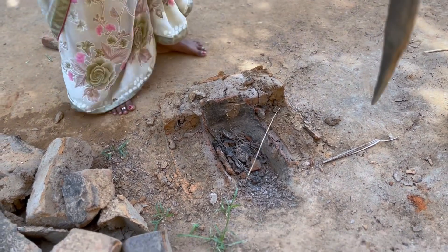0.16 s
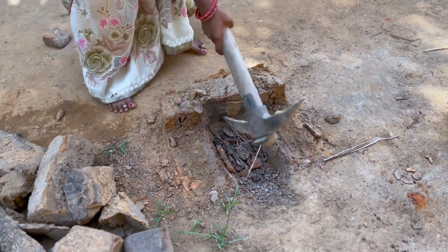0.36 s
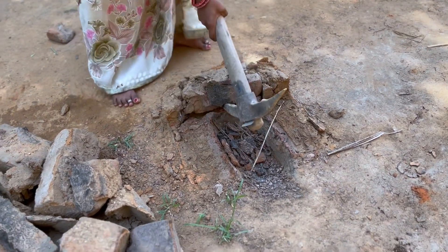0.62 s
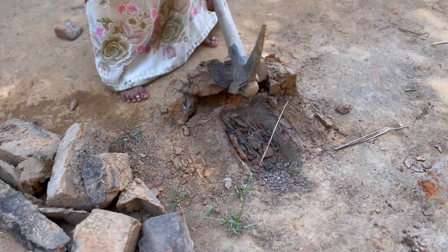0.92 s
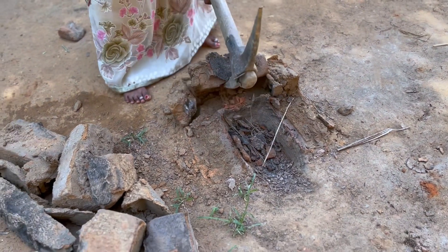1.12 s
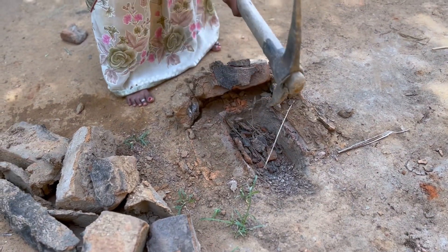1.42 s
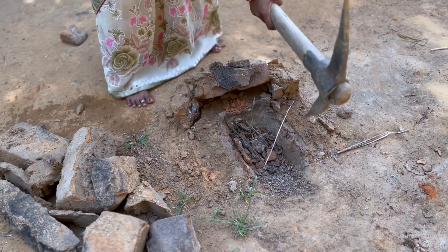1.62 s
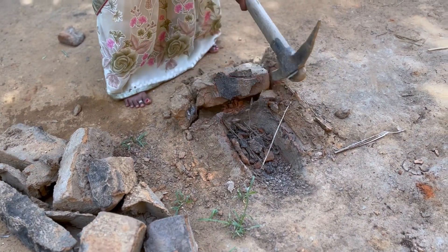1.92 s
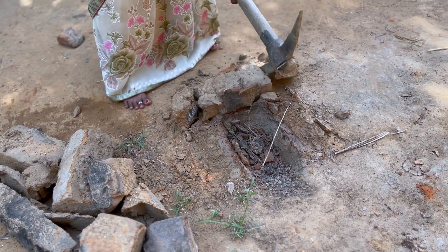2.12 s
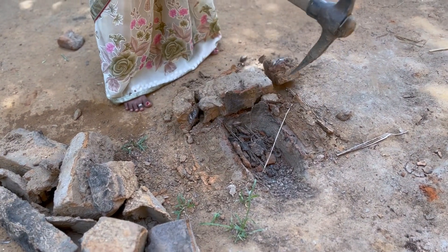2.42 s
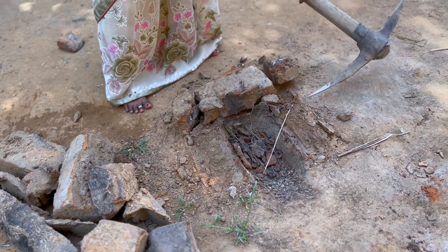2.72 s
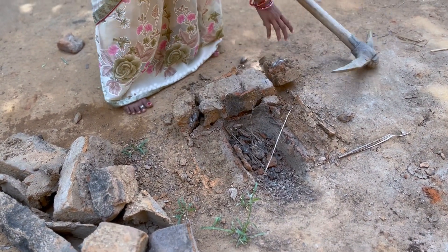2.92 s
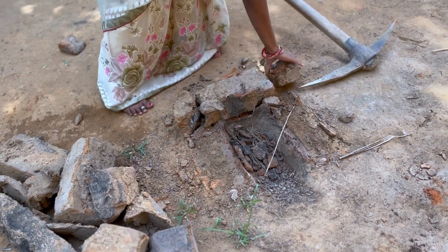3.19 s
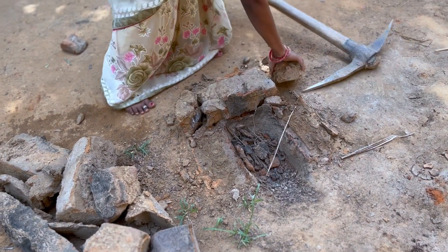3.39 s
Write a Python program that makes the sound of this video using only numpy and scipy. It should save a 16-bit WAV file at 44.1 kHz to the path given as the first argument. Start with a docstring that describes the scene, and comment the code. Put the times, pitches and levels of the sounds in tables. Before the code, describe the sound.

A pickaxe hits brick and dried clay several times in an open yard, each blow followed by clattering pieces and trickling grit. A fly buzzes faintly past, more chunks knock down, and a tossed brick ends it with a sharp clack.

```python
"""An open yard: a pickaxe is driven into an old stove of brick and dried mud, levered and dragged out.
Chunks knock, crack and thud on the ground and grit trickles, all exciting one bank of rubble resonances.
The steel head and glass bangles ring briefly, a fly buzzes past, and at the end a brick is tossed hard
onto other bricks. A small two-port microphone hears it over far rumble and leaf hiss."""
import sys
import numpy as np
from scipy import signal
from scipy.fft import rfft, irfft, next_fast_len
from scipy.io import wavfile
from scipy.ndimage import map_coordinates

SR = 44100
rng = np.random.default_rng(int(sys.argv[2]) if len(sys.argv) > 2 else 0)


def output_pcm(signal):
    """Save a mono or channel-first signal as 16-bit PCM at the path in sys.argv[1].

    Samples are clipped to [-1, 1] before scaling.
    """
    pcm = np.clip(np.atleast_2d(signal).T, -1, 1) * 32767
    wavfile.write(sys.argv[1], SR, np.round(pcm).astype(np.int16))


N = 156555
TIME = np.arange(N) / SR

# Knocks of steel, brick and clay. Each row: start in seconds, clack level in dB, clack pitch in Hz,
# six band levels in dB from low to high, rattle hold in seconds, rattle t60 at 2 kHz in seconds.
KNOCKS = [(0.233, -34, 2260, -69, -74, -62, -38.5, -69, -47, 0.0049, 0.067),
          (0.337, -2, 3060, -44, -12.5, -18.5, -11.5, -20.5, -29, 0.0065, 0.063),
          (0.35, -16, 2350, -45, -18, -40, -37, -23, -33, 0.0015, 0.075),
          (0.366, -5, 1750, -28.5, -44, -35, -22, -23.5, -29.5, 0.0026, 0.1),
          (0.421, -9, 4380, -42, -41.5, -45, -34, -27, -32, 0.0017, 0.044),
          (0.537, -32, 960, -36.5, -46, -46, -29, -57, -52, 0.0022, 0.068),
          (0.552, -23.5, 719, -77, -22.5, -42.5, -29.5, -42, -43, 0.0041, 0.083),
          (0.579, -21, 4220, -42, -74, -66, -49, -39.5, -60, 0.002, 0.048),
          (0.626, -28, 2920, -47, -63, -46, -31, -52, -39, 0.003, 0.089),
          (0.649, -35, 5660, -50, -69, -59, -40, -49, -32, 0.003, 0.045),
          (0.803, -37, 3600, -50, -70, -56, -33, -56, -63, 0.0027, 0.022),
          (0.827, -36, 1780, -53, -67, -68, -56, -61, -63, 0.0027, 0.037),
          (0.862, -33, 942, -45, -55, -41, -35, -53, -69, 0.0027, 0.045),
          (0.916, -21.5, 890, -62, -38, -39, -42, -40, -48, 0.0021, 0.074),
          (1.021, -17, 800, -96, -16, -20, -31.5, -36, -47.5, 0.0073, 0.022),
          (1.078, -19, 6780, -49, -68, -66, -97, -35.5, -43, 0.0034, 0.043),
          (1.227, -32, 786, -61, -44, -43, -77, -49, -67, 0.0026, 0.04),
          (1.267, -45, 800, -62, -49.5, -42.5, -63, -48.5, -84, 0.0023, 0.085),
          (1.331, -33, 776, -88, -53, -49, -90, -67, -80, 0.003, 0.026),
          (1.359, -38, 786, -66, -62, -56, -81, -67, -76, 0.0024, 0.038),
          (1.504, 1.5, 4170, -31, -14.5, -30, -21.5, -17, -24.5, 0.0011, 0.044),
          (1.608, -23, 1155, -54, -69, -31.5, -55, -41, -61, 0.0028, 0.032),
          (1.736, -18, 2430, -48, -41, -39, -25.5, -35, -35, 0.0046, 0.09),
          (1.747, 3.5, 3050, -64, -25.5, -38, -16.5, -25, -31, 0.0036, 0.069),
          (1.76, -2.5, 2450, -37, -52, -29.5, -27, -57, -31, 0.0051, 0.078),
          (1.777, -9, 2950, -28, -36.5, -34, -18.5, -43, -30.5, 0.0046, 0.1),
          (1.79, 0.5, 3070, -40, -39, -61, -30, -41, -40, 0.0021, 0.045),
          (1.8, -9, 2430, -59, -51, -39, -41, -47, -45, 0.0035, 0.067),
          (1.827, -25, 2640, -55, -42, -85, -22, -48, -45, 0.0034, 0.071),
          (1.885, -24, 2140, -37, -48, -63, -37, -62, -55, 0.0026, 0.078),
          (1.905, -6, 2245, -40, -21.5, -29.5, -23.5, -18, -27.5, 0.0011, 0.037),
          (1.992, -30, 743, -34.5, -34, -52, -43, -47, -49, 0.0022, 0.085),
          (2.014, -29, 2650, -35, -35, -73, -44, -51, -48, 0.0033, 0.067),
          (2.057, -25, 1820, -36, -58, -59, -42, -69, -48, 0.0034, 0.065),
          (2.09, -45, 770, -23, -34, -83, -43.5, -70, -41.5, 0.003, 0.048),
          (2.272, -24, 978, -50, -53, -48.5, -31, -39.5, -42, 0.0063, 0.066),
          (2.455, -22, 3210, -69, -65, -60, -37.5, -63, -47, 0.004, 0.096),
          (2.53, -23, 3124, -63, -69, -36.5, -25, -64, -45, 0.0039, 0.045),
          (2.74, -16, 1070, -32, -37, -20, -29.5, -41, -39.5, 0.002, 0.089),
          (2.775, 0, 1138, -4.5, -49, -5.5, -25.5, -26.5, -27.5, 0.0011, 0.056),
          (2.802, -4, 1560, -28, -68, -41, -24.5, -47, -32, 0.0037, 0.05),
          (2.817, -10.5, 2340, -26, -66, -46, -54, -39, -29.5, 0.0024, 0.066),
          (2.878, -24, 1080, -19, -30, -37, -43, -67, -58, 0.005, 0.074),
          (2.918, -16, 797, -42, -23.5, -31, -23.5, -24.5, -30, 0.0016, 0.043),
          (2.944, -14, 2370, -27, -49, -58, -32.5, -43, -67, 0.0027, 0.095),
          (3.095, -37, 830, -42, -73, -42, -47, -55, -46.5, 0.0035, 0.053),
          (3.12, -15, 1777, -29.5, -34, -36.5, -35.5, -37, -53, 0.0028, 0.12),
          (3.168, -19, 3270, -41, -48, -60, -35.5, -57, -44, 0.003, 0.071),
          (3.186, -23, 1590, -50, -60, -51, -36.5, -45.5, -38.5, 0.0019, 0.095),
          (3.219, -34, 2210, -46, -53, -66, -34.5, -67, -52, 0.0033, 0.049),
          (3.289, -35, 2000, -55, -66, -77, -40, -68, -67, 0.005, 0.08),
          (3.309, -29.5, 830, -32, -38.5, -45.5, -33.5, -35.5, -39.5, 0.003, 0.078),
          (3.46, -35, 2960, -58, -84, -74, -34.5, -59, -46, 0.0035, 0.041),
          (3.489, -36.5, 1620, -49, -71, -45, -47, -78, -70, 0.0075, 0.14),
          (3.52, -12, 1920, -25.5, -28.5, -10.5, -2.5, -15, -60, 0.0036, 0.033)]


def from_db(db):
    """Decibels to gain."""
    return 10 ** (np.asarray(db) / 20)


def at_hz(hz, points_hz, values):
    """Read a curve on a log-frequency axis."""
    return np.interp(np.log(hz), np.log(points_hz), values)


def drift(rate_hz):
    """A smooth random wander with a spread of 1."""
    pole = np.exp(-80 * np.pi * rate_hz / SR)
    slow = signal.lfilter([1], [1, -2 * pole, pole * pole], rng.standard_normal(N // 40 + 2002))[2000:]
    return np.interp(np.arange(N) / 40, np.arange(len(slow)), slow / slow.std())


def butter(x, hz, kind):
    """A second-order Butterworth filter."""
    return signal.sosfilt(signal.butter(2, hz, kind, fs=SR, output="sos"), x)


def ring(clicks, hz, t60):
    """One resonance: a unit click starts a decaying sine of height 1."""
    r, w = from_db(-60 / (t60 * SR)), 2 * np.pi * hz / SR
    return signal.lfilter([0, np.sin(w)], [1, -2 * r * np.cos(w), r * r], clicks + 1e-18)


def grains(per_s, spread_db):
    """Tiny collisions: random clicks of uneven size, at an rms of 1."""
    hits = rng.random(N) < per_s / SR
    sizes = from_db(spread_db * np.minimum(rng.exponential(1, N), 4))
    clicks = hits * sizes * rng.choice([-1, 1], N)
    return clicks / clicks.std()


def yard_air():
    """Far rumble and leaf hiss: half-octave noise bands, each wavering on its own."""
    # The bed's tone. Each row: frequency in Hz, relative noise density in dB.
    spectrum = [(15, -33), (25, -3.5), (81, 3.5), (205, -26), (275, 9.5), (368, -30), (549, -5), (661, -49),
                (796, -20.5), (1190, -10), (1770, -22.5), (2020, -12.5), (4260, -16.5), (14500, -30)]
    out, edges = 0, 25 * 2 ** np.arange(0, 9.6, .5)
    white = rng.standard_normal((2, N))
    for k, (low, high) in enumerate(zip(edges, edges[1:])):
        band_db = at_hz(np.sqrt(low * high), *np.transpose(spectrum)) + 2 * drift(10.7)
        out = out + butter(white[k % 2], [low, high], "band") * from_db(band_db)
    return from_db(-58) * out / out.std()


def trickling_grit(hz, clumps):
    """Grit trickles and scrapes in clumps: the grains that drive the resonance at hz."""
    # The flow of grit. Each row: time in seconds, then rumble, low, middle and treble levels in dB.
    flow = [(0.0, -63, -104, -78, -63.5), (0.21, -74, -72, -65, -59.5), (0.35, -67, -73, -43, -78),
            (0.47, -46, -56, -46, -54), (0.52, -54, -54, -48, -58.5), (0.65, -62.5, -63, -63.5, -69),
            (0.88, -59.5, -65, -47, -63), (1.05, -61, -49.5, -52.5, -65.5), (1.21, -67, -64.5, -87, -69),
            (1.33, -74, -65.5, -91, -100), (1.54, -55, -61, -55, -48), (1.69, -59, -58.5, -59.5, -59.5),
            (1.81, -58, -52, -48, -51), (1.9, -61, -59, -52, -55), (1.95, -54, -58.5, -51, -54.5),
            (2.07, -58, -74, -53.5, -62.5), (2.25, -58, -60, -107, -64.5), (2.38, -64, -91, -66, -82),
            (2.6, -60.5, -42, -55, -44.5), (2.72, -52.5, -51.5, -56, -49.5), (2.8, -37, -62, -47.5, -53),
            (2.91, -44, -55, -47.5, -58.5), (2.99, -41, -64, -55, -54.5), (3.16, -53, -64, -80, -78),
            (3.31, -53.5, -71, -55, -58), (3.55, -64, -80, -51.5, -65)]
    # The centres of those four bands in Hz.
    bands_hz = [130, 480, 2000, 7500]
    times, *bands_db = np.transpose(flow)
    weights = [at_hz(hz, bands_hz, band) for band in np.eye(4)]
    level_db = sum(weight * np.interp(TIME, times, db) for weight, db in zip(weights, bands_db))
    clump_db = 3.5 * (clumps + drift(19)) / 2
    return from_db(level_db + clump_db) * grains(per_s=900, spread_db=3.5)


def knocking_chunks(hz):
    """Each knock is one blow and a dying rattle: the clicks that drive the resonance at hz."""
    # The centres of the six knock bands in Hz.
    bands_hz = [130, 400, 1100, 2700, 5500, 11000]
    # The boost of the first blow in each band, in dB.
    blow_db = [24.5, 19.1, 17.4, 21, 4.3, 5.3]
    age, attack_s = np.arange(SR // 5) / SR, 0.0026
    rattle, blows = np.zeros((2, N + len(age)))
    late = 20 + int(0.8 / hz * SR)  # low pitches speak later
    for start, _, _, *levels_db, hold, t60 in KNOCKS:
        i = int(start * SR)
        db = at_hz(hz, bands_hz, levels_db) + 2.5 * rng.standard_normal()  # each knock has its own colour
        blows[i + late] += from_db(db + at_hz(hz, bands_hz, blow_db))
        decay_s = np.clip(t60, .008, .2) * (2000 / hz) ** 0.13  # low pitches rattle longer
        fall_db = 60 * np.maximum(age - hold, 0) / decay_s
        rattle[i:i + len(age)] += from_db(db - fall_db) * np.minimum(age / attack_s, 1)
    return blows[:N] + from_db(-2.5) * rattle[:N] * grains(per_s=2200, spread_db=4)


def rubble():
    """Fragments of all sizes: a bank of resonances rung by the knocks and the grit."""
    out, clumps = np.zeros(N), drift(17)
    click = signal.unit_impulse(SR // 4)
    thud_cycles, fragment_cycles = 5, 28  # low thuds die in fewer cycles: dull rather than pitched
    for hz in np.geomspace(75, 15000, 46):
        drive = knocking_chunks(hz) + trickling_grit(hz, clumps)
        t60 = at_hz(hz, [300, 1500], [thud_cycles, fragment_cycles]) / hz
        ringing = ring(drive, hz, t60) / np.linalg.norm(ring(click, hz, t60))
        out += signal.lfilter(*signal.butter(1, hz * .7, "high", fs=SR), ringing) / np.sqrt(7)
    return out


def clacks():
    """In each knock one piece clacks at a pitch of its own, with a weaker neighbouring tone."""
    out, age = np.zeros(N + SR), np.arange(SR // 10) / SR
    trim_db, t60_cycles, rise_s = -11.5, 43.3, 0.0022
    for start, db, hz, *_ in KNOCKS:
        envelope = from_db(db + trim_db - 60 * age * hz / t60_cycles) * np.minimum(age / rise_s, 1)
        phase = 2 * np.pi * hz * age
        pair = np.sin(phase) + 0.71 * np.sin(phase * rng.uniform(0.952, 1.6))
        i = int(start * SR)
        out[i:i + len(age)] += envelope * pair
    return out[:N]


def struck(modes, hits, longest_t60=.12):
    """Each contact is a short rattle that rings every mode of a body, with ring time capped."""
    out = np.zeros(N)
    for hz, mode_db, t60 in modes:
        drive = np.zeros(N + SR)
        for start, hit_db, contact_s in hits:
            i, n = int(start * SR), int(contact_s * SR) + 2
            rattle = rng.standard_normal(SR // 8)[:n]
            # Even out how hard the random rattle pushes this mode.
            push = abs(np.sum(rattle * np.exp(2j * np.pi * hz * np.arange(n) / SR)))
            drive[i:i + n] += from_db(hit_db + mode_db) * rattle / max(push, np.sqrt(n) / 2)
        out += ring(drive[:N], hz, min(t60, longest_t60))
    return out


def pick_head():
    """The steel head rings briefly as it meets the stove."""
    # Steel modes. Each row: pitch in Hz, level in dB, t60 in seconds before the cap.
    modes = [(754, -16, 0.16), (931, -1, 0.11), (1723, -19, 0.12), (2067, -29, 5.0), (2406, 0, 0.051),
             (2573, -17, 0.062), (3467, -6, 0.061), (4802, -9, 0.15), (5405, -17, 0.24), (6040, -6, 0.12),
             (7628, -20, 0.075), (10480, -25, 0.13)]
    # Contacts. Each row: start in seconds, level in dB, length in seconds.
    hits = [(.340, -37, 0.032), (1.747, -28, 0.068), (2.270, -33.5, 0.024), (3.123, -43, 0.0089)]
    return struck(modes, hits)


def bangles():
    """Glass bangles touch and give small, high clinks."""
    # Glass modes. Each row: pitch in Hz, level in dB, t60 in seconds before the cap.
    modes = [(3558, -33, 0.21), (4969, -11, 0.025), (5599, 0, 0.026), (9426, -7, 0.051), (10620, -22, 0.13),
             (11300, -32, 0.1)]
    # Contacts. Each row: start in seconds, level in dB, length in seconds.
    clinks = [(.424, -40, .01), (.628, -42, 0.012), (.652, -34, 0.013), (1.082, -57, .005),
              (2.819, -44, 0.006)]
    return struck(modes, clinks)


def fly():
    """A passing fly: five wingbeat harmonics wavering in pitch and level."""
    # The fly-by. Each row: time in seconds, wingbeat in Hz, level in dB.
    flight = [(2.05, 306, -97), (2.151, 299, -88), (2.302, 281.7, -54.5), (2.4, 265.2, -63),
              (2.6, 268, -70), (2.72, 262, -86), (2.93, 301, -94), (3.0, 300, -73), (3.249, 308, -77),
              (3.36, 300, -96)]
    times, hz, db = np.transpose(flight)
    wingbeat_hz = np.interp(TIME, times, hz) * (1 + 0.0061 * drift(26))
    phase = 2 * np.pi * np.cumsum(wingbeat_hz) / SR
    buzz = sum(from_db(harmonic_db + 2.5 * drift(5.3)) * np.sin(k * phase)
               for k, harmonic_db in enumerate([0.5, -4, -9, -10, -20], 1))
    return from_db(np.interp(TIME, times, db)) * buzz


def tossed_brick():
    """A brick lands hard on other bricks with a short, dry ring."""
    # Brick modes. Each row: pitch in Hz, level in dB, t60 in seconds before the cap.
    modes = [(748, -25, 0.061), (877, -28, 0.14), (1776, -6, 0.026), (2331, -23, 0.1), (3112, 0, 0.011),
             (3580, -30, 0.058), (3978, -36, 0.034), (4167, -47, 0.17), (4490, -40, 0.057),
             (5771, -39, 0.041)]
    # The landing. One row: start in seconds, level in dB, contact length in seconds.
    landing = [(3.521, 0.5, 0.008)]
    return struck(modes, landing)


def at_ports(sound):
    """Left and right: below 5 kHz the right port hears the sound slightly later."""
    # The lag as the work moves aside. Each row: time in seconds, delay in milliseconds.
    right_lag = [(0, .1), (.3, .03), (.45, .03), (.5, .2), (.98, .2), (1.0, .43), (1.08, .43), (1.12, .2),
                 (1.46, .2), (1.49, .43), (1.58, .43), (1.7, .03), (2.45, .03), (2.52, .21), (2.72, .21),
                 (2.735, .03), (3.55, .03)]
    lag = np.interp(TIME, *np.transpose(right_lag)) * SR / 1000
    low = signal.sosfiltfilt(signal.butter(4, 5000, fs=SR, output="sos"), sound)
    late_low = map_coordinates(low, [np.arange(N) - lag], order=3, mode="nearest")
    return np.array([sound, sound - low + late_low])


def yard_echoes(sound):
    """Dull reflections off ground and walls, reaching the right port later and earlier by turns."""
    # Reflections. Each row: delay at the left port in seconds, level in dB.
    echoes = [(.007, -16.5), (.019, -14), (.033, -22)]
    out, side_s = np.zeros((2, N)), 0.00116
    dull = signal.lfilter([.4], [1, -.6], sound)
    for k, (delay_s, db) in enumerate(echoes):
        for side in (0, 1):
            delay = int((delay_s + side_s * side * (-1) ** k) * SR)
            out[side] += from_db(db) * np.pad(dull, (delay, 0))[:N]
    return out


def scene():
    """The pick work with its echoes and the fly, over a bed of yard air."""
    work = butter(rubble() + clacks() + pick_head() + bangles() + tossed_brick(), 85, "high")
    stereo = at_ports(work + fly()) + yard_echoes(work)
    wide_air = from_db(-3.5) * butter(yard_air(), [487, 5560], "band") * [[1], [-1]]
    return stereo + yard_air() + wide_air


def record(dry):
    """The microphone: two ports colour and shift the sound, peaks clip, and the very top is cut."""
    # How the ports differ. Each row: frequency in Hz, right phase in half turns, left over right in dB.
    ports = [(30, -.08, 0), (300, -.08, 1.5), (1100, -.15, 2), (1500, -.55, -3), (1900, -.2, 3),
             (4000, -.2, 2), (5000, 0, 2.5), (6000, .3, 4), (8050, .93, 0), (8650, 1.07, 0), (9800, 1.5, 0),
             (11100, 2, 0), (13000, 2, 0), (14600, 3, 0), (16000, 3, 0)]
    # The tone both ports share. Each row: frequency in Hz, gain in dB.
    port_tone = [(5500, 1), (7000, 8), (8300, 10.5), (9500, 4.5), (11500, -8), (13500, -4), (15000, 4.5)]
    size = next_fast_len(N + 4096)
    hz = np.arange(size // 2 + 1) * SR / size
    port_hz, half_turns, tilt_db = np.transpose(ports)
    tilt = from_db(np.interp(hz, port_hz, tilt_db) / 2)
    shift = np.exp(1j * np.pi * np.interp(hz, port_hz, half_turns))
    colour = from_db(np.interp(hz, *np.transpose(port_tone)))
    stereo = irfft(rfft(dry, size) * colour * [tilt, shift / tilt], size)[:, :N]
    top_cut = signal.cheby2(12, 70, 16328, fs=SR, output="sos")
    return np.clip(signal.sosfilt(top_cut, np.clip(stereo, -1, 1)), -1, 1)


dry = scene()
out = record(dry)
output_pcm(out)
```